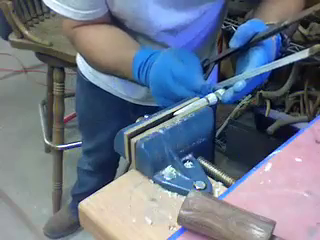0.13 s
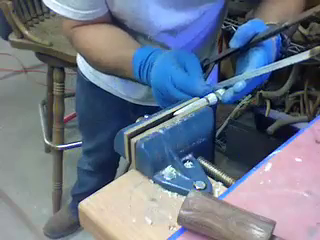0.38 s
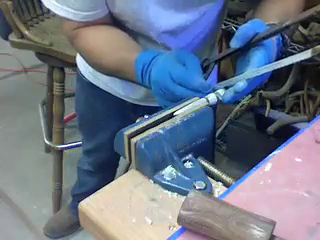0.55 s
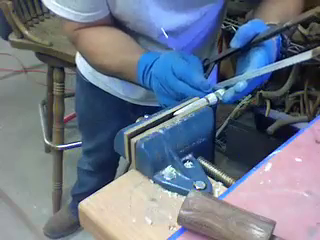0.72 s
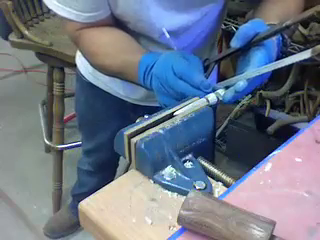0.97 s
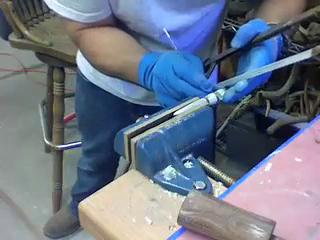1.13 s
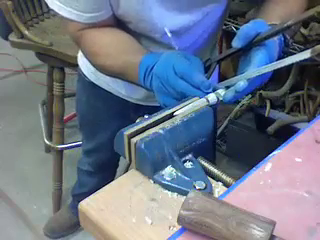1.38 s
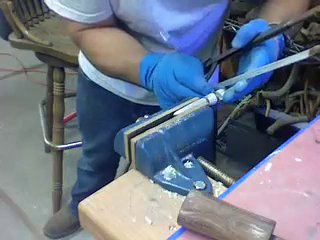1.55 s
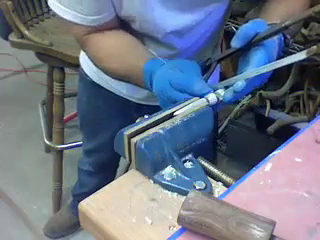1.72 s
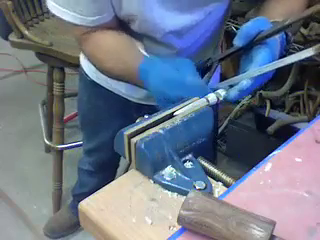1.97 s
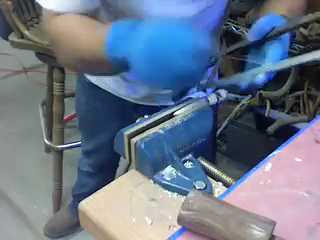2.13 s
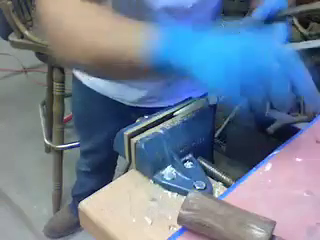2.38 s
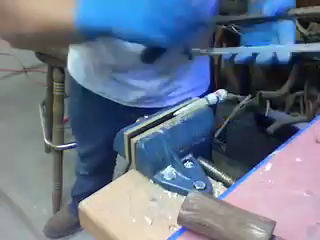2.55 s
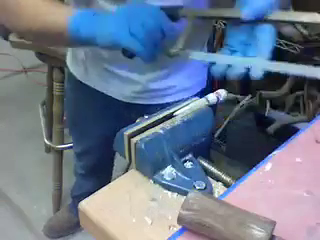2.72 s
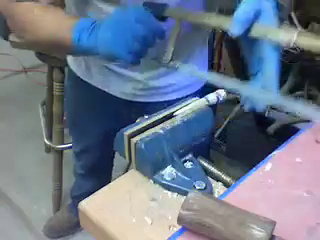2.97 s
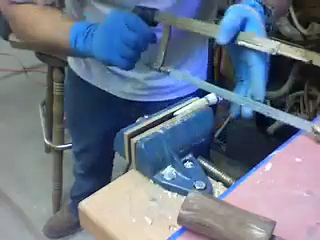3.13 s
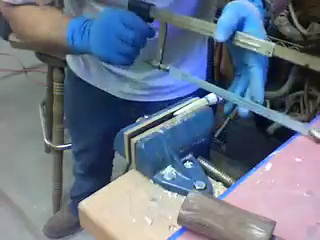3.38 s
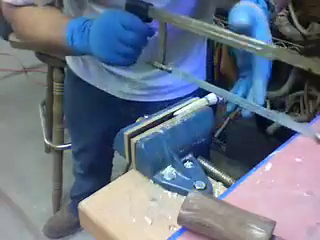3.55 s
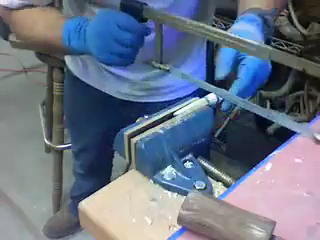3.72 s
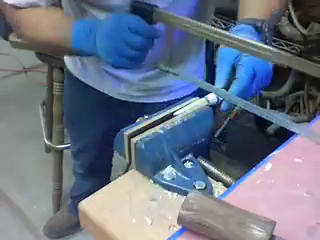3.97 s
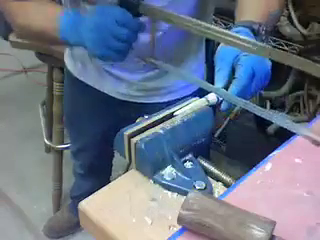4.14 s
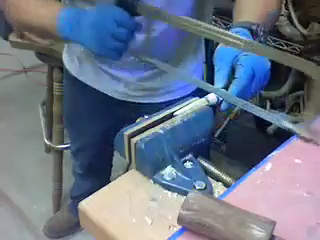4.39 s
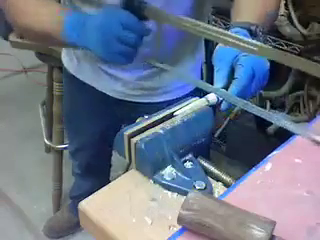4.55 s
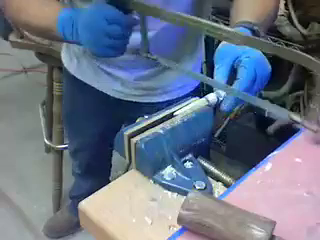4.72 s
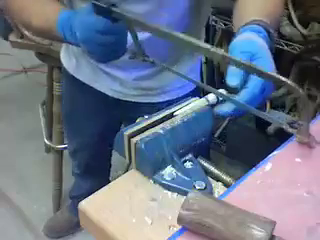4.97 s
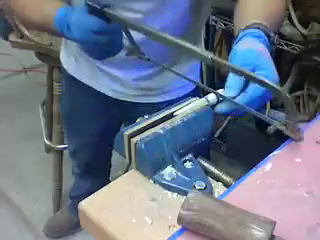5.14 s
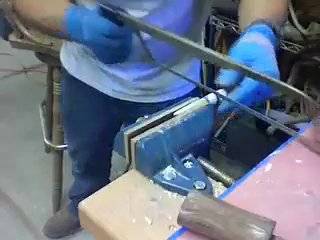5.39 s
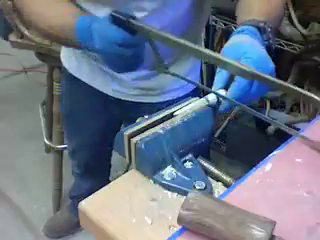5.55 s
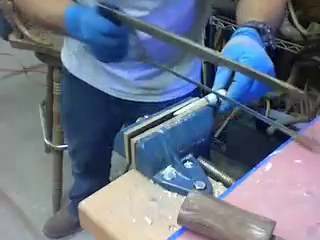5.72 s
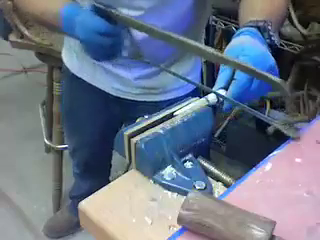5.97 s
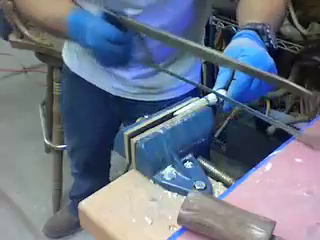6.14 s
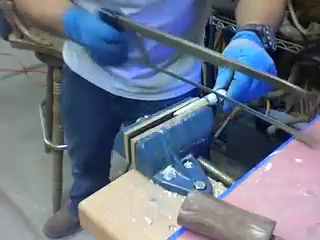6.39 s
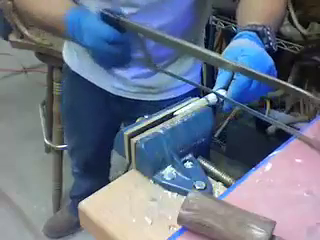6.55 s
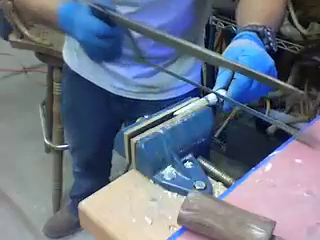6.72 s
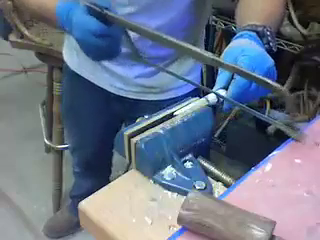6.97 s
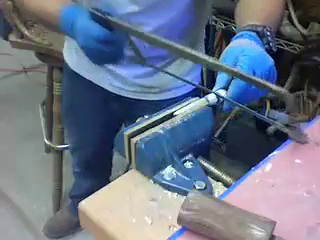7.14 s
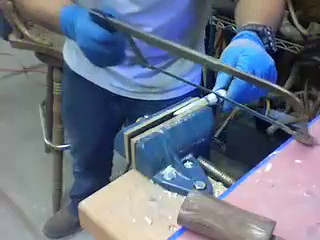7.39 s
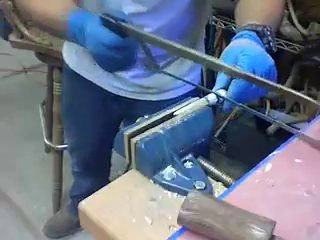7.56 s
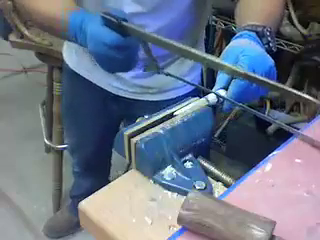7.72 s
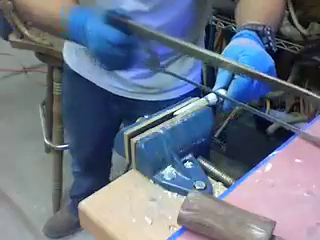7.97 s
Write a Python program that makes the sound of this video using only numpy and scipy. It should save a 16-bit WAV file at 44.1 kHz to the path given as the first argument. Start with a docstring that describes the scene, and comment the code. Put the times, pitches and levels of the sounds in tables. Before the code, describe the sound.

In a small, quiet workshop with faint air noise, a hard steel click is followed by a pause, another knock, and the bright clack of a loose saw frame. The blade then stutters in short, rough jerks with woody knocks. After a brief lull, sawing starts slowly and quickens to about eight even strokes a second, growling through the vise and bench. Close microphone, short live room tail.

```python
"""Hacksaw starting a notch at a vise

A wood and brass piece is clamped in a bench vise in a small workshop. Tools click, the saw is picked up;
the blade catches in short jerks, then runs in quick even strokes. Tooth blows, paced by blade speed,
ring the vise and bench; shaped noise makes the steel's rasp, slides, short tones and ticks.
Room tails answer, over steady air and mains hum."""
import sys
import numpy as np
from scipy import signal
from scipy.fft import rfft, irfft, next_fast_len
from scipy.io import wavfile
from scipy.ndimage import map_coordinates

SR = 44100
rng = np.random.default_rng(int(sys.argv[2]) if len(sys.argv) > 2 else 0)


def transcribe(u):
    """Save the signal u as a 16-bit wav file named by the first command-line argument.

    u: samples, shape (n,) or (channels, n), limited to [-1, 1]; the rate is SR.
    q: integer samples, one column per channel.
    """
    v = np.clip(np.atleast_2d(u).T, -1, 1)
    q = np.round(v * 32767).astype(np.int16)
    wavfile.write(sys.argv[1], SR, q)


N = 357165

# Response curves are relative: body() scales each to energy 1. Mode widths are floored at hz / 35.
# steady strokes, pull and push in turn, each lasting until the next:
# start_s, top_pair_hz (tooth pairs), peak_0to1 (moment of top speed), evenness_0to1, lean_0to1,
# thrum_db, growl_db, rasp_db
STROKES = [(5.389, 261.3, 0.51, 0.02, 0.4, -37.5, -37.5, -52.5),
           (5.645, 295.8, 0.48, 0, 0.9, -38.5, -42, -49),
           (5.817, 425, 0.44, 0.3, 0.24, -44.5, -35.5, -47.5),
           (5.957, 329.3, .58, 0.15, 0.78, -34, -35, -45.5),
           (6.09, 470.6, .51, 0.5, 0.45, -43.5, -33, -44.5), (6.216, 465.7, 0.58, 0.55, 0, -34, -32, -45.5),
           (6.342, 470.8, .53, 0.62, 0.45, -36, -34, -44.5),
           (6.465, 453, 0.49, 0.73, .05, -35.5, -34, -45.5),
           (6.585, 463, .46, 0.59, 0.43, -35.5, -33.5, -45),
           (6.708, 474.4, .51, 0.6, 0.33, -32.5, -31.5, -43.5),
           (6.83, 458.4, 0.46, 0.65, 0.57, -38.5, -37.5, -44.5),
           (6.947, 447.8, 0.56, 0.6, 0, -33.5, -32.5, -45), (7.066, 463, 0.42, 0.72, 0.54, -38, -34.5, -45),
           (7.185, 396, 0.48, 0.7, 0.22, -33, -32, -43), (7.299, 426.6, .48, 0.99, 0.37, -36, -27.5, -41.5),
           (7.417, 334.2, 0.46, 0.45, .2, -27, -29.5, -37),
           (7.535, 411.7, .5, 0.65, 0.47, -33.5, -32, -42.5),
           (7.647, 330.5, 0.51, 0.19, 0.4, -29.5, -32.5, -41.5),
           (7.764, 429.8, 0.49, 0.78, 0.64, -32.5, -32, -43),
           (7.875, 416.6, 0.49, 0.38, 0.3, -30, -30.5, -40.5),
           (7.979, 475.6, 0.47, 0.7, 0.55, -34, -34.5, -41.5)]
# first jerks over the uncut surface: start_s, length_s, force_db, rasp_db
JERKS = [(3.509, 0.098, -54.5, -70), (3.674, 0.074, -46, -60.5), (3.852, 0.1, -47.5, -55),
         (3.902, 0.087, -36.5, -48.5), (4.034, 0.15, -35, -43), (4.203, 0.073, -45.5, -57.5),
         (4.266, 0.098, -35.5, -43), (4.389, 0.096, -38.5, -44.5), (4.449, 0.097, -40.5, -47),
         (4.567, 0.1, -41.5, -51.5), (4.629, 0.071, -39.5, -51), (4.714, 0.078, -46.5, -51.5),
         (4.77, 0.089, -51.5, -49.5), (4.978, 0.079, -54, -68), (5.098, 0.18, -50.5, -65)]
# hard clicks of steel on vise and work: start_s, tick_db, lowest_tick_hz, knock_db, flex_lift_db
CLICKS = [(0.475, -23, 4250, -29.5, 13), (0.526, -47, 4500, -49, 5), (0.655, -64, 3000, -46.5, 6),
          (1.845, -37, 4600, -26, 8), (2.019, -55, 3000, -49.5, 4), (2.862, -46, 3600, -72, 7),
          (3.229, -47, 1500, -47.5, 8), (3.283, -53, 2000, -54, 12), (3.676, -45, 3000, -68, 9),
          (4.291, -28, 1820, -25.5, -4), (4.978, -36, 1250, -44, 15), (5.451, -40, 1500, -30.5, -6)]
# clacks of the loose saw frame: start_s, tick_db, lowest_tick_hz, knock_db
FRAME_CLACKS = [(2.433, -34.5, 1860, -68), (2.462, -23.5, 2300, -39.5), (2.501, -54, 2800, -72),
                (2.528, -39, 5000, -65), (2.549, -44, 3500, -71), (2.737, -47, 1470, -66)]
# bumps on the work and catches of the teeth, dull to sharp: start_s, knock_db, contact_s
BUMPS = [(1.429, -53, 0.0022), (3.231, -49, 0.0055), (3.283, -48, 0.0057), (3.57, -42.5, 0.00058),
         (3.711, -42, 0.0007), (3.945, -26, 0.0021), (4.074, -22.5, 0.0014), (4.09, -24, 0.002),
         (4.157, -24.5, 0.0017), (4.238, -29, 0.0013), (4.426, -42, 0.001), (4.513, -33, 0.0018),
         (4.584, -43, .0005), (5.252, -34.5, 0.001), (5.305, -42, 0.00072), (5.364, -40, 0.003),
         (5.395, -38.5, 0.00032), (6.322, -22, 0.0017), (6.856, -26, 0.00073), (6.613, -29.5, 0.00044),
         (7.199, -34, 0.00054), (7.327, -31, 0.00037), (7.441, -22, 0.00069), (7.892, -26, 0.00065)]
# slides, scrapes, squeals, and short tones of struck or sawn steel and vise:
# start_s, length_s, centre_hz, width_hz, level_db (before TONE_TRIM_DB)
SLIDES_AND_TONES = [(1.84, 0.022, 6020, 200, -52), (2.84, 0.19, 7700, 6000, -60),
                    (2.859, 0.13, 3240, 1300, -55.5), (3.683, 0.057, 1160, 200, -44),
                    (3.91, 0.074, 497, 67, -32.5), (4.054, 0.029, 10900, 6600, -50),
                    (4.277, 0.061, 7020, 7000, -37.5), (4.399, 0.1, 3740, 1400, -44.5),
                    (4.965, 0.043, 2250, 1900, -48), (5.245, .04, 495, 150, -42),
                    (5.41, .24, 824.4, 6.8, -36.5), (5.42, 0.12, 1170, 210, -41.5),
                    (5.85, 0.11, 837, 14, -36.5), (5.985, 0.086, 1280, 94, -35),
                    (6.064, 0.18, 14100, 1100, -54), (6.23, 0.087, 10200, 340, -46.5),
                    (6.341, 0.13, 13800, 2700, -45.5), (6.874, 0.039, 6840, 280, -37),
                    (6.978, 0.076, 6540, 910, -46), (7.098, 0.052, 6900, 280, -41),
                    (7.33, 0.084, 6900, 600, -41.5), (7.335, 0.12, 840, 16, -33.5),
                    (7.56, 0.06, 6450, 960, -41), (7.793, 0.043, 6540, 1600, -36.5),
                    (8.004, 0.056, 6650, 2000, -39)]
# bench and vise, broad response: hz, level_db
BENCH_CURVE = [(30, -44), (70, -8), (120, -10.5), (195, -5.5), (300, -1), (430, -1), (600, -2.5), (890, -4),
               (970, -8.5), (1330, -5), (1450, -23.5), (2000, -26), (4000, -16.5), (9000, -104)]
# bench and vise resonances: hz, width_hz, lift_db
BENCH_MODES = [(151.2, 13.3, 9.9), (215.3, 8.5, 3), (359, 16, 7.5), (453.5, 16, 5.7), (519.8, 34, 10.4),
               (632.5, 34, 7.9), (711, 19, 5), (757.6, 17, 6.4), (834.7, 33, 8.4), (1167, 180, 2.2),
               (1273, 150, 4.6), (1564, 41, 15.6)]
# main vise resonance: hz (shifts with grip), width_hz, lift_db
VISE_MODE = [(275, 56, 15)]
# blade and frame, broad response: hz, level_db
BLADE_CURVE = [(700, -14), (1600, 1.5), (2200, -1), (4000, 2), (4800, -3.5), (6000, 4.5), (7400, -0.5),
               (9400, -2), (10400, -10.5), (11200, -10), (13300, -10), (15800, -17.5)]
# blade and frame resonances: hz, width_hz, lift_db
BLADE_MODES = [(1513, 67, 8.5), (2070, 180, 3.8), (2420, 48, 1.8), (2535, 65, 5.4), (3030, 30, 2.1),
               (3880, 91, 1.6), (4084, 50, 6.4), (6100, 38, 2.4), (6270, 42, 0.71), (6884, 67, 11),
               (7570, 78, 8.1), (8830, 114, 10.2), (9400, 70, 1.3), (10225, 180, 17.8), (13100, 120, 5)]
# tick of steel on steel, broad response: hz, level_db
TICK_CURVE = [(900, 27), (2000, -9), (2800, -1), (3800, 0.5), (4700, -5), (6400, -2), (8000, -4.5),
              (9300, -7), (11000, -20), (12800, -11), (15800, -28)]
# tick resonances: hz, width_hz, lift_db
TICK_MODES = [(4000, 400, 4), (5900, 350, 8), (9100, 630, 2.2)]
# loose saw frame resonances: hz, width_hz, lift_db
FRAME_MODES = [(2800, 500, 5.5), (3500, 550, 6.5), (6400, 350, 5)]
# room decay: hz, t60_s
ROOM_T60 = [(150, 0.34), (1000, 0.87), (5000, 0.55), (14000, 0.13)]
# left/right difference: hz, side_level_db
SIDE_CURVE = [(1400, -76), (2400, -71), (4500, -25), (8000, -9), (13000, -6.5)]
# workshop air, relative spectrum: hz, density_db (per Hz)
AIR_CURVE = [(18, -74), (30, -14), (88, -28), (108, -7), (225, -4.5), (284, -0.5), (324, -4), (350, -4),
             (709, -5), (897, -9.5), (970, -8), (2180, -13.5), (3320, -15.5), (11300, -25.5), (15500, -31)]
# mains hum: hz, rms_db
HUM = [(119.5, -73.5), (240, -100), (360, -74)]

LAST_STROKE_END_S = 8.096
CATCH_DB = (-3.5, -2)  # over the growl: pull, push
CATCH_S, CATCH_CONTACT_S = 0.027, 0.0012  # delay after each turn; hold of a catching tooth
SLACK_GAIN = 0.71  # tooth force before the catch
CHIP_GAIN, JERK_CHIP_GAIN = 0.59, 0.55  # chips relative to snags
ROUGH_DB, JERK_ROUGH_DB = 3, 3  # bite unevenness, scaled by 1 - evenness
GLIDE_SWELL_DB, GLIDE_TOP_HZ, GLIDE_GAIN = 6, 1100, 0.26
THRUM_TOP_HZ, DULL_TOP_HZ = 335, 4500  # crossovers: thrum/growl, dull/bright scratch

JERK_HZ, JERK_FORCE_DB, JERK_DB_PER_OCTAVE = 214.8, -40, 10.5  # pair rate at a middling force
JERK_EVEN, JERK_LEAN = 0.11, 0.56  # 0-1
JERK_THRUM_DB, JERK_CATCH_DB = 0.5, 1.5  # over the force

TICK_CYCLES = 94  # cycles of the lowest tick pitch per 60 dB decay of the exciting noise
CLICK_CONTACT_S = 0.000073
FLEX_HZ = (150, 90)  # bench-top flex under a blow from above: centre, width
BUMP_TICK_DB, BUMP_TICK_HZ = -11.5, 1680  # tick of a bump, relative to its knock
JINGLE_DB, JINGLE_T60_S, JINGLE_GRAIN_DB = -15, 0.21, 19  # level relative to tick
BEND_S, BEND_HZ = 0.00585, 497  # bending-wave delay at low pitch; half of it remains at BEND_HZ
TONE_TRIM_DB = -2.0

# grip-to-grip spread: lift_db, share of pitch
BENCH_GRIP, BLADE_GRIP = (2.2, 0.015), (1.8, 0.012)
VISE_SHIFT = 0.03  # share of pitch
ROOM_DB, ROOM_RENEW_S = -11.5, 0.25
AIR_DB = -58.5
TOP_HZ = 15800


def sawing(steel):
    """Pull and push strokes in turn, each with one catch of the teeth after the turn."""
    out = np.zeros(N)
    ends_s = [row[0] for row in STROKES[1:]] + [LAST_STROKE_END_S]
    for k, (row, end_s) in enumerate(zip(STROKES, ends_s)):
        start_s, *teeth, growl_db, rasp_db = row
        add(out, start_s, stroke(end_s - start_s, *teeth, growl_db, rasp_db, CHIP_GAIN, ROUGH_DB))
        catch_db = growl_db + CATCH_DB[k % 2]
        add(out, start_s + CATCH_S, bump(catch_db, CATCH_CONTACT_S, steel))
    return out


def jerks(steel):
    """First short tries: the blade stutters and catches, faster the harder it is pushed."""
    out = np.zeros(N)
    for start_s, length_s, force_db, rasp_db in JERKS:
        pair_hz = JERK_HZ * 2 ** ((force_db - JERK_FORCE_DB) / JERK_DB_PER_OCTAVE)
        jerk = stroke(length_s, pair_hz, 0.5, JERK_EVEN, JERK_LEAN, force_db + JERK_THRUM_DB, force_db,
                      rasp_db, JERK_CHIP_GAIN, JERK_ROUGH_DB)
        add(out, start_s, jerk)
        add(out, start_s + CATCH_S, bump(force_db + JERK_CATCH_DB, CATCH_CONTACT_S, steel))
    return out


def stroke(length_s, pair_hz, peak, evenness, lean, thrum_db, growl_db, rasp_db, chip_gain, rough_db):
    """One pass: the blade speeds up, slows and stops; its teeth strike and scratch the cut."""
    n = int(length_s * SR)
    progress = (np.arange(n) + 0.5) / n
    phase = np.interp(progress, [0, np.clip(peak, 0.2, 0.8), 1], [0, 0.5, 1])
    speed = np.sin(np.pi * phase) ** 0.92
    turns = np.cumsum(pair_hz * speed * (1 + 0.012 * wobble(n, 120))) / SR  # tooth pairs passed
    even = np.clip(evenness, 0, 1)

    force = tooth_force(turns, progress, pair_hz, even, lean, chip_gain)
    load = np.where(np.arange(n) < CATCH_S * SR, SLACK_GAIN, 1)
    roughness = amp(rough_db * (1 - even) * wobble(n, 140.0))
    shake = signal.fftconvolve(force * load * roughness * speed ** 0.49, gripped_bench())
    # the bench thrums below the crossover, vise and work growl above
    thrum = filtered(shake, lambda hz: 1 / (1 + (hz / THRUM_TOP_HZ) ** 12))
    growl = shake - thrum

    rasp = signal.fftconvolve(tooth_scratch(turns, speed),
                              body(BLADE_CURVE, regripped(BLADE_MODES, *BLADE_GRIP)))
    return at_level(thrum, thrum_db, n) + at_level(growl, growl_db, n) + at_level(rasp, rasp_db, n)


def tooth_force(turns, progress, pair_hz, even, lean, chip_gain):
    """Even teeth give a gliding tone; uneven ones snag irregularly and tear off chips."""
    n = len(turns)
    # teeth set left and right in turn; a leaning blade rocks the work and sounds an octave lower
    left = pulses(turns, scatter=0.02, size_db=1.0)
    right = pulses(turns + 0.5, scatter=0.02, size_db=1.0)
    glide = left + np.cos(np.pi * lean) * right
    glide = filtered(glide, lambda hz: 1 / (1 + (hz / GLIDE_TOP_HZ) ** 6))
    glide = GLIDE_GAIN * unit(glide * amp(GLIDE_SWELL_DB * progress))

    snag = unit(pulses(turns, scatter=0.3034, size_db=2))
    chips = unit(rng.standard_normal(n) * amp(2.3 * wobble(n, 444.5)))
    tearing = unit(snag + chip_gain * chips)
    # fast teeth leave little force far below their own rate
    tearing = filtered(tearing, lambda hz: hz ** 4 / (hz ** 4 + (0.4 * pair_hz) ** 4))
    return np.sqrt(even) * glide + (1 - even) ** 0.65 * tearing


def tooth_scratch(turns, speed):
    """Noise pulsing with each tooth pair, stronger and brighter at speed."""
    n = len(turns)
    bite = 1 + 0.5 * np.cos(2 * np.pi * turns)
    grit = rng.standard_normal(n) * bite * amp(0.25 * wobble(n, 485.0) + 1.53 * wobble(n, 64.2))
    dull = filtered(grit, lambda hz: 1 / (1 + (hz / DULL_TOP_HZ) ** 4))
    bright = grit - dull
    return dull * (speed ** 1.6 + 0.29) + 0.92 * bright * (speed ** 1.7 + 0.057)


def pulses(turns, scatter, size_db):
    """One blow per passing tooth, scattered in time and size."""
    chance = rng.standard_normal((128, 2))
    tooth = np.arange(len(chance)) + 0.5 + scatter * chance[:, 0]
    passed = (tooth > 0) & (tooth < turns[-1])
    samples = np.searchsorted(turns, tooth[passed])
    return np.bincount(samples, amp(size_db * chance[passed, 1]), len(turns))


def contacts(steel):
    """Clicks from above that flex the bench top, clacks of the frame, bumps and tooth catches."""
    out = np.zeros(N)
    for start_s, *how, flex_db in CLICKS:
        flexed_bench = body(BENCH_CURVE, BENCH_MODES + VISE_MODE + [(*FLEX_HZ, flex_db)])
        add(out, start_s, contact(*how, CLICK_CONTACT_S, steel, flexed_bench))
    frame = body(TICK_CURVE, FRAME_MODES)
    for start_s, *how in FRAME_CLACKS:
        add(out, start_s, contact(*how, CLICK_CONTACT_S, frame, body(BENCH_CURVE, BENCH_MODES)))
    for start_s, knock_db, contact_s in BUMPS:
        add(out, start_s, bump(knock_db, contact_s, steel))
    return out


def contact(tick_db, lowest_hz, knock_db, contact_s, steel, bench):
    """A crack in the steel, a jingle and a bench knock; a longer contact knocks duller."""
    t = np.arange(SR // 6) / SR
    treble = signal.butter(4, lowest_hz, "high", fs=SR, output="sos")
    crack = rng.standard_normal(len(t)) * amp(-60 * t * lowest_hz / TICK_CYCLES)
    crack = signal.fftconvolve(signal.sosfilt(treble, crack), steel)
    # loose steel jingles on in uneven grains
    grains = rng.standard_normal(len(t)) * amp(JINGLE_GRAIN_DB * wobble(len(t), 410) - 60 * t / JINGLE_T60_S)
    jingle = filtered(signal.sosfilt(treble, grains), lambda hz: amp(along(TICK_CURVE, hz)))

    # loose vise parts spread the blow over a few milliseconds
    rattle = rng.standard_normal(len(t)) * (1 - np.exp(-t / 0.001)) * amp(-60 * t / 0.022)
    blow = at_level(rattle, -7.5, 0.96) + (t == 0)
    # bending wave: treble arrives first
    blow = filtered(blow, lambda hz: np.exp(-2j * np.pi * BEND_S * BEND_HZ * np.arctan(hz / BEND_HZ)))
    half_sine = np.sin(np.pi * np.minimum(t / contact_s, 1))
    push = signal.fftconvolve(half_sine, blow)[:len(t)]
    push = signal.sosfilt(signal.butter(2, 122, "high", fs=SR, output="sos"), push)
    knock = signal.fftconvolve(push, bench)

    out = at_level(crack, tick_db, 0.00093 * SR) + at_level(knock, knock_db, 0.0055 * SR)
    add(out, 0, at_level(jingle, tick_db + JINGLE_DB, 0.0015 * SR))
    return out


def bump(knock_db, contact_s, steel):
    """A bump or tooth catch: mostly knock, with a faint tick."""
    return contact(knock_db + BUMP_TICK_DB, BUMP_TICK_HZ, knock_db, contact_s, steel, gripped_bench())


def slides_and_tones():
    """Slides, scrapes, squeals, and short tones of struck or sawn steel and vise."""
    out = np.zeros(N)
    for start_s, *how in SLIDES_AND_TONES:
        add(out, start_s, noise_tone(*how))
    return out


def noise_tone(length_s, centre_hz, width_hz, level_db):
    """One noise band, swelling and fading; the narrower, the more it sounds like a tone."""
    n = int(length_s * SR)
    band = filtered(rng.standard_normal(SR // 4),
                    lambda hz: 1 / (1 + (2.06 * (hz - centre_hz) / width_hz) ** 2))[:n]
    return at_level(band * np.hanning(n), level_db + TONE_TRIM_DB, n)


def gripped_bench():
    """Response of bench and vise under the grip of the moment."""
    return body(BENCH_CURVE, regripped(BENCH_MODES, *BENCH_GRIP) + regripped(VISE_MODE, 0, VISE_SHIFT))


def regripped(modes, spread_db, detune):
    """The same resonances, randomly shifted in pitch and lift by a new grip."""
    chance = rng.standard_normal((len(modes), 2))
    return [(hz * (1 + detune * a), width_hz, lift_db + spread_db * b)
            for (hz, width_hz, lift_db), (a, b) in zip(modes, chance)]


def body(points, modes, size=8192):
    """Causal (minimum-phase) impulse response, energy 1: a broad spectrum with resonances."""
    hz = np.fft.rfftfreq(size, 1 / SR)
    db = along(points, hz)
    for centre_hz, width_hz, lift_db in modes:
        width_hz = max(width_hz, centre_hz / 35)  # limit the sharpness so that none rings too long
        db = db + lift_db / (1 + (2 * (hz - centre_hz) / width_hz) ** 2)
    # fold the cepstrum to make the response causal
    cepstrum = irfft(np.log(amp(db)))
    cepstrum[1:size // 2] *= 2
    cepstrum[size // 2 + 1:] = 0
    response = irfft(np.exp(rfft(cepstrum)))
    return response / np.linalg.norm(response)


def echo(x):
    """A diffuse tail drawn anew every ROOM_RENEW_S and crossfaded, so no pitch hangs on."""
    out, hop = np.zeros(N), int(ROOM_RENEW_S * SR)
    for i in range(0, N, hop):
        hz, t, z = signal.stft(rng.standard_normal(SR // 2), SR, nperseg=256)
        decay = amp(-60 * t / along(ROOM_T60, hz)[:, None])
        onset = 1 - np.exp(-t / 0.00068)
        tail = signal.istft(z * decay * onset, SR, nperseg=256)[1]
        first = max(i - hop, 0)
        piece = x[first:i + hop]
        fade = np.hanning(2 * hop)[max(hop - i, 0):][:len(piece)]
        add(out, first / SR, signal.fftconvolve(piece * np.sqrt(fade), tail / np.linalg.norm(tail)))
    return out


def background():
    """Steady workshop air (shaped noise) with a faint mains hum (sines)."""
    t = np.arange(N) / SR
    air = unit(filtered(rng.standard_normal(N), lambda hz: amp(along(AIR_CURVE, hz))))
    hum = sum(amp(db) * np.sqrt(2) * np.sin(2 * np.pi * hz * t) for hz, db in HUM)
    return amp(AIR_DB) * air + hum


def amp(db):
    """Decibels to gain."""
    return 10 ** (np.asarray(db) / 20)


def unit(x):
    """x at rms 1."""
    return x / np.sqrt(np.mean(x ** 2) + 1e-20)


def at_level(x, db, n):
    """x with the energy of n samples at db rms."""
    return x * amp(db) * np.sqrt(n / (np.sum(x ** 2) + 1e-20))


def along(points, hz):
    """(hz, value) points read on a log frequency axis."""
    f, v = np.transpose(points)
    return np.interp(np.log(hz + 1), np.log(f), v)


def add(track, start_s, sound):
    """Mix a sound into a track in place, cut off at the track's end."""
    room_left = track[round(start_s * SR):][:len(sound)]
    room_left += sound[:len(room_left)]


def wobble(n, knots_per_s):
    """A smooth random curve of n samples."""
    return map_coordinates(rng.standard_normal(256), [np.arange(n) * knots_per_s / SR], mode="wrap")


def filtered(x, response):
    """x times a frequency response."""
    n = x.shape[-1]
    m = next_fast_len(n + 8192)
    return irfft(rfft(x, m) * response(np.fft.rfftfreq(m, 1 / SR)), m)[..., :n]


def scene():
    """Work at the bench in its room; mainly the treble differs between the ears."""
    steel = body(TICK_CURVE, TICK_MODES)
    work = jerks(steel) + sawing(steel) + contacts(steel) + slides_and_tones()
    mid = work + amp(ROOM_DB) * echo(work) + background()
    # nearby surfaces scatter the treble unequally to left and right
    t = np.arange(SR // 10) / SR
    scatter = rng.standard_normal(len(t)) * amp(-60 * t / 0.1)
    side = signal.fftconvolve(mid, scatter / np.linalg.norm(scatter))[:N]
    side = filtered(side, lambda hz: amp(along(SIDE_CURVE, hz)))
    return np.array([mid + side, mid - side])


def record(dry):
    """Band limit: removes everything from TOP_HZ up."""
    return filtered(dry, lambda hz: hz < TOP_HZ)


dry = scene()
out = record(dry)
transcribe(out)
```